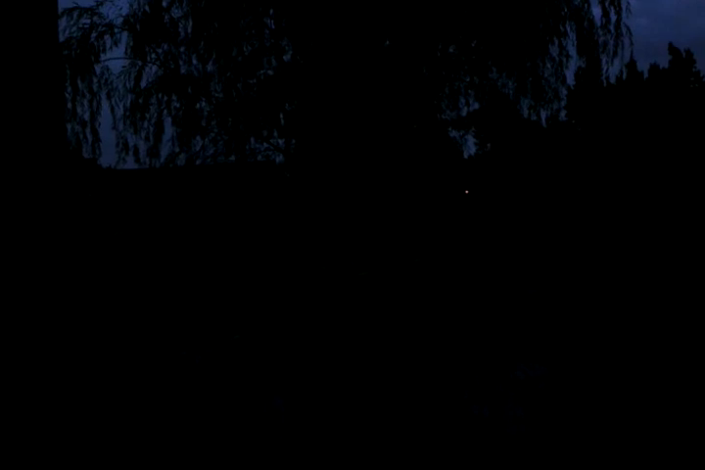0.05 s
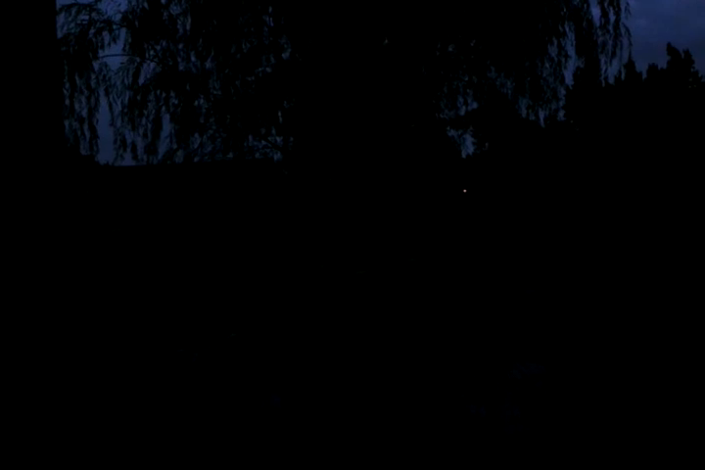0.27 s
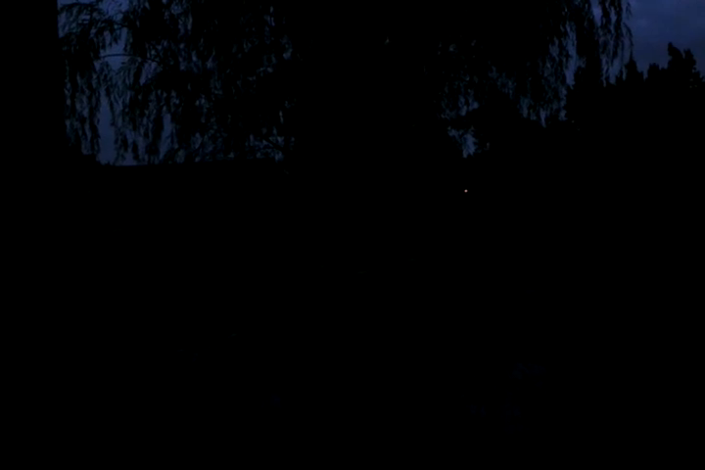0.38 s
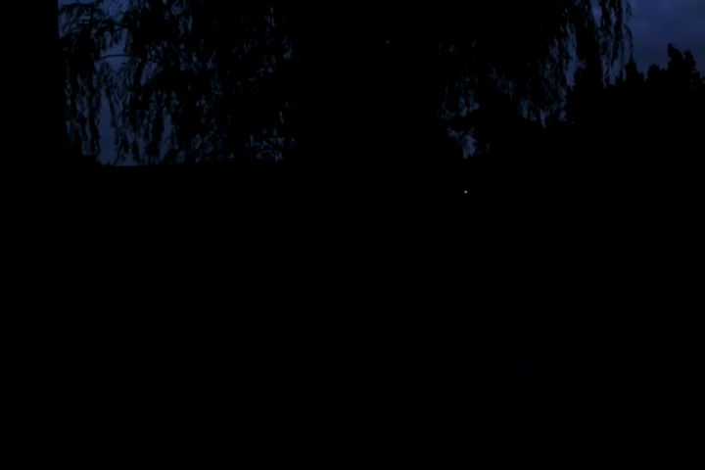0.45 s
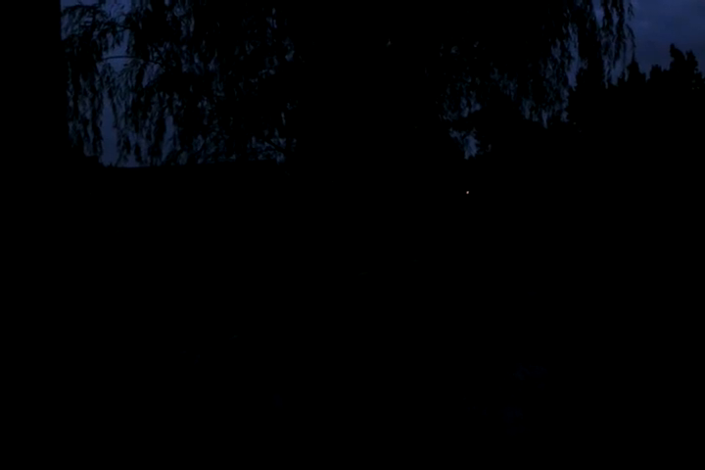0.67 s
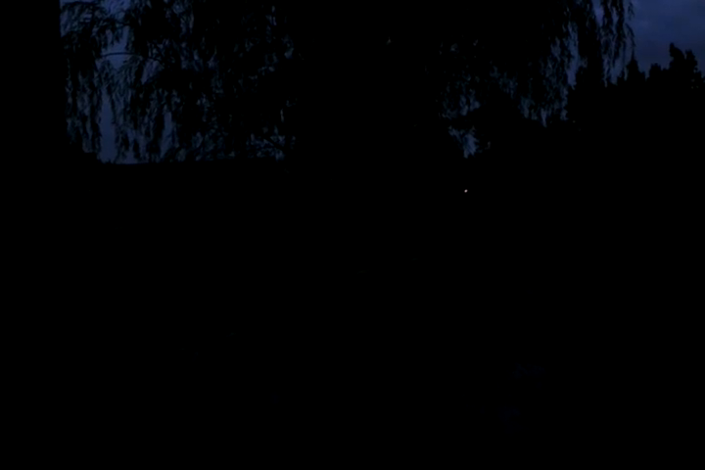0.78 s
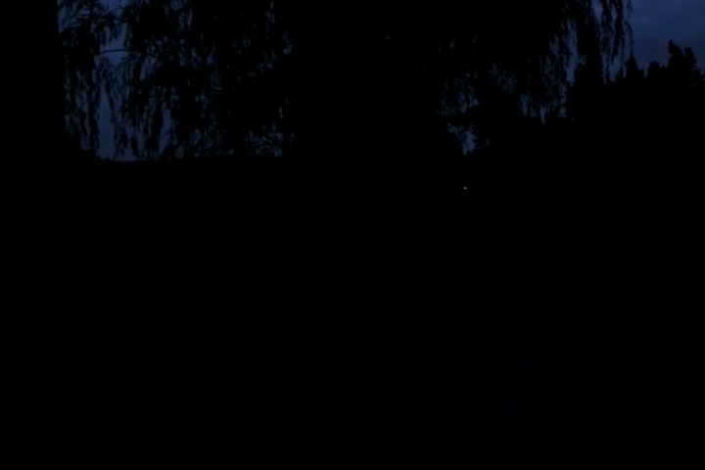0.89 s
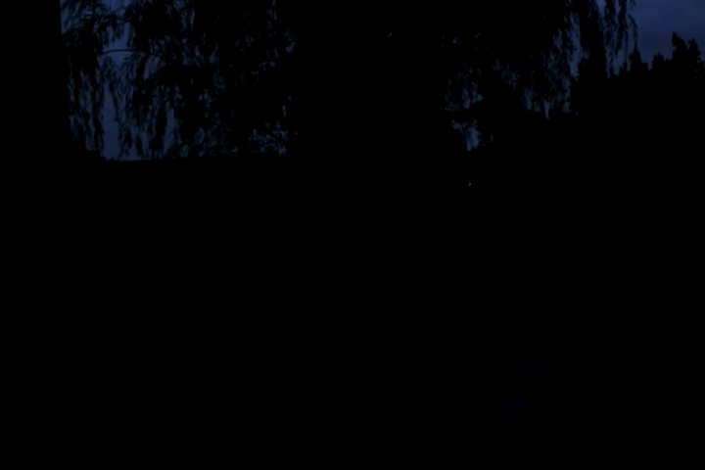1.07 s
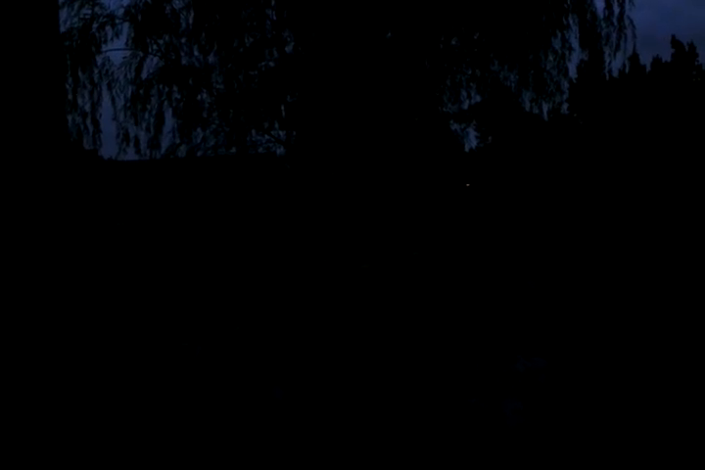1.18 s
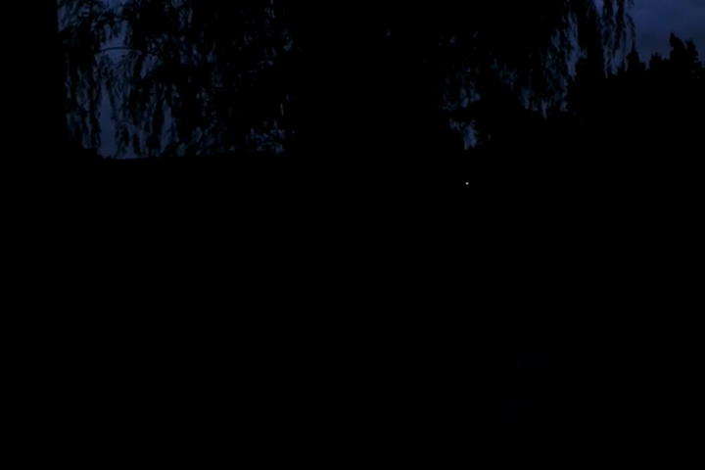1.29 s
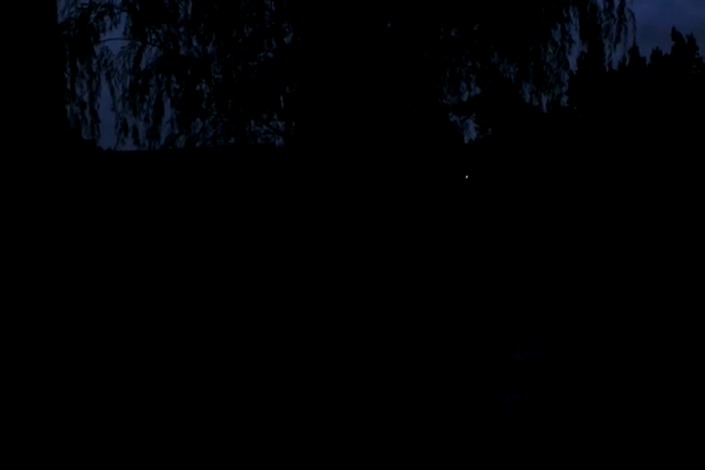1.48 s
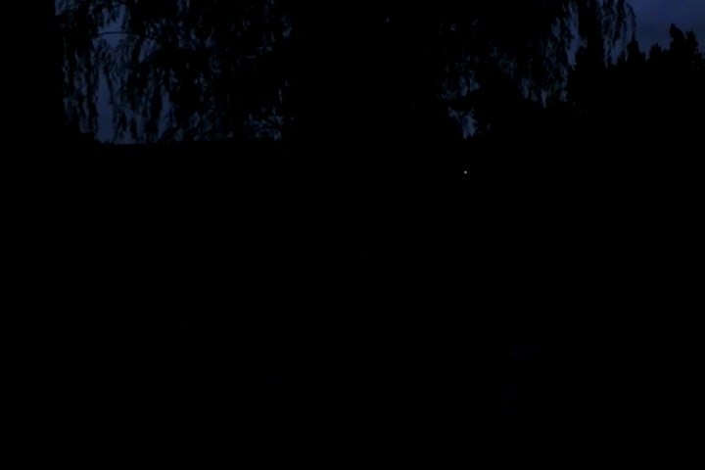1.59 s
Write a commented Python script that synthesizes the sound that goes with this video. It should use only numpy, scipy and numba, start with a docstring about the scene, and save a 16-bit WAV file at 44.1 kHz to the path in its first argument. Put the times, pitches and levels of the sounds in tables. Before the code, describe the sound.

Frogs call among trees at night: a far croak ends, a loud rasping croak follows nearby, and several throbbing answers come from farther away. A few faint chirps, a blurred frog chorus and steady hiss lie behind them.

```python
"""Tree frogs at night. Over steady hiss and a distant chorus, a far croak is ending; a close, harsh
croak follows, then five answers from farther off, with three faint chirps among them.
In each croak the vocal membranes hum near 900 Hz and snap shut every few cycles; the snaps, smeared
by foliage, excite vocal sac and throat, and the call brightens. Most croaks throb in beats; some
settle into a clean buzz with a snap on every third cycle. The trees echo after each."""
import sys
import numpy as np
from scipy import signal
from scipy.fft import rfft, irfft
from scipy.io import wavfile
from scipy.ndimage import uniform_filter1d
from numba import njit

SR = 44100
rng = np.random.default_rng(int(sys.argv[2]) if len(sys.argv) > 2 else 0)


def put_to_file(sound):
    """Save the sound as 16-bit audio at rate SR, in the file named by the first command-line argument."""
    columns = np.atleast_2d(sound).T  # one column per channel
    safe = np.clip(columns, -1, 1)
    whole_steps = np.round(safe * 32767)
    wavfile.write(sys.argv[1], SR, whole_steps.astype(np.int16))


N = 72765

# Spectrum of the night air. Each row: frequency in Hz, relative level in dB.
AIR_SPECTRUM = [(30, -46.5), (64, -32.5), (92, -23.5), (120, -4.5), (214, -3.5), (350, -6.5), (600, -9.5),
                (870, -9), (1320, -3), (1700, -5.5), (2650, -1), (3300, -10), (4000, -6.5), (6400, -11),
                (7400, -23.5)]
# The far croaks. Each row: start in seconds, length in seconds, base pitch in Hz, base levels of hum,
# sac, throat and rasp in dB, time of one beat in seconds, beat rate in Hz, beat depth from 0 to 1,
# share of the call before it turns clean (above 1, never).
FAR_CROAKS = [(-.095, 0.17, 879.3, -43.5, -70, -40, -46.5, -.09, 50, 0, 0.5),
              (0.488, 0.078, 847, -56.5, -50.5, -53.5, -58.5, .51, 55.1, 0.33, 1.1),
              (0.658, .17, 890.6, -37.5, -41.5, -37.5, -45, .663, 62.3, 0.75, .42),
              (1.018, 0.14, 946.6, -41.5, -43, -44, -48, 1.1, 42.1, .6, 1.2),
              (1.376, .17, 883.4, -43, -49.5, -38, -49, 1.39, 50.1, 0, .42),
              (1.571, 0.12, 955.4, -42, -45, -47.5, -49.5, 1.571, 44, 0.25, 1.2)]
# Course of every far croak. Each row: share of its length, ratio to the base pitch, throat resonance
# in Hz, offsets to the levels of hum, sac, throat and rasp in dB.
FAR_COURSE = [(0, 1.025, 2070, -12.5, -1.5, -24.5, -12), (0.052, 1.02, 2140, -3.5, 0, -12.5, -5),
              (.26, 1.01, 2494, 1, 1, -1, -2.5), (.46, 1.0, 2775, 2, -0.5, -1.5, 5.5),
              (0.732, .998, 2860, 0, -9, -4, -3), (0.852, .985, 2850, -5, -12.5, -4.5, -9),
              (.92, .965, 3054, -27, -11.5, -19.5, -9), (1, 0.84, 2980, -44, -49, -9.5, -27)]
# Spectrum of the far frogs' snaps. Each row: frequency in Hz, relative level in dB.
FAR_RASP_SPECTRUM = [(500, -47.5), (820, -20), (1100, -6.5), (1450, -1.5), (1770, -9), (2050, -1),
                     (3500, -8.5), (3850, -7.5), (4400, -8), (4900, -13), (6200, -9.5), (7400, -20)]
# Course of the close croak. Each row: time in seconds, pitch in Hz, levels of hum, lower resonance,
# upper resonance and rasp in dB.
CLOSE_COURSE = [(.171, 821, -43, -45.5, -64.5, -56), (0.1836, 819, -49, -68.5, -57, -57),
                (0.189, 840, -34.5, -31, -67, -34.5), (0.202, 831.5, -38, -36.5, -50, -43.5),
                (.21, 855.6, -31.5, -17.5, -68.5, -31), (0.236, 852.4, -29, -16, -44.5, -33.5),
                (0.26, 848, -26.5, -22.5, -26.5, -38), (0.321, 849, -31, -23.5, -29, -39),
                (0.345, 805, -43.5, -28.5, -36, -39), (0.377, 781, -61.5, -54.5, -56.5, -49.5)]
# The close frog's lower and upper throat resonances. Each row: centre in Hz, width in Hz.
CLOSE_RESONANCES = [(2290, 325), (2830, 196)]
# Spectra of the close frog's snaps and of its treble. Each row: frequency in Hz, relative level in dB.
CLOSE_RASP_SPECTRUM = [(450, -75.5), (700, -15), (850, -3), (1050, -2.5), (1300, 3.5), (1800, 2),
                       (2700, -7.5), (4300, -21), (5100, -23.5), (6100, -20), (7200, -31.5)]
CLOSE_TREBLE_SPECTRUM = [(2200, -34), (3200, 4), (3700, 6), (4350, 1), (4900, -17), (5450, -8),
                         (5950, -3.5), (6350, -14), (6900, -37), (7500, -26.5)]
# Distant chirps. Each row: time of the peak in seconds, level in dB.
DISTANT_CHIRPS = [(0.871, -52), (0.923, -50), (1.27, -56)]

SAC_RATIO, SAC_WIDTH_HZ = 1.133, 101  # the vocal sac rings just above the hum
BEAT_FADE = .3  # share of the beat depth lost over a call


def undb(db):
    """Amplitude grows tenfold for every 20 dB."""
    return 10 ** (np.asarray(db) / 20)


def unit(x):
    """Normalisation to rms 1."""
    return x / np.sqrt(np.mean(x ** 2) + 1e-18)


def even(x, window_s=.0045):
    """Division by the running rms holds a vibration at a nearly steady strength."""
    power = uniform_filter1d(x ** 2, int(window_s * SR))
    return x / np.sqrt(np.abs(power) + .05 * np.mean(x ** 2))


def ring(x, hz, width_hz):
    """Resonance: two like resonators in cascade give a band with steep sides."""
    b, a = signal.iirpeak(hz, hz / width_hz, fs=SR)
    return signal.lfilter(b, a, signal.lfilter(b, a, x))


@njit
def glide(x, hz, width_hz):
    """Time-varying resonance: a band-pass with a moving centre."""
    y, band, low = np.empty(len(x)), 0., 0.
    for i in range(len(x)):
        g, damping = np.tan(np.pi * hz[i] / SR), width_hz / hz[i]
        v = (band + g * (x[i] + 1e-18 - low)) / (1 + g * (g + damping))
        band, low = 2 * v - band, low + 2 * g * v
        y[i] = damping * v
    return y


def colour(x, spectrum):
    """Minimum-phase filtering imposes a spectrum causally."""
    hz, db = np.array(spectrum, float).T
    freqs = np.maximum(np.fft.rfftfreq(2 * N, 1 / SR), 1)
    gain = undb(np.interp(np.log(freqs), np.log(hz), db))
    cepstrum = irfft(np.log(gain))
    cepstrum[1:N] *= 2
    cepstrum[N + 1:] = 0
    return irfft(rfft(x, 2 * N) * np.exp(rfft(cepstrum)))[:N]


def follow(t, course):
    """Linear interpolation of a course: on-off gate, progress from 0 to 1, then each column."""
    times = course[:, 0]
    gate = uniform_filter1d(1. * ((t > times[0]) & (t < times[-1])), size=96)
    progress = np.clip((t - times[0]) / (times[-1] - times[0]), 0, 1)
    return [gate, progress] + [np.interp(t, times, column) for column in course[:, 1:].T]


def waver(t, rate_hz, spread_db):
    """Random amplitude modulation: a gain that drifts between Gaussian levels in dB."""
    return undb(spread_db * np.interp(t * rate_hz, np.arange(N), rng.standard_normal(N)))


def night_air():
    """Filtered noise: a broad band is heard as hiss, a narrow low one as a faint drone."""
    hiss = unit(colour(rng.standard_normal(N), AIR_SPECTRUM))
    drone = unit(ring(rng.standard_normal(N), hz=117.6, width_hz=11))
    return undb(-53.5) * hiss + undb(-74.5) * drone


def chorus(t):
    """Incoherent sum: many distant frogs blur into a flickering band of noise."""
    blur = ring(rng.standard_normal(N), hz=2620, width_hz=460)
    return undb(-61.5) * unit(blur * waver(t, rate_hz=90, spread_db=4))


def hum(t, cycles):
    """The membranes' fundamental vibration: a slightly unsteady sine of rms 1."""
    return unit(np.sin(2 * np.pi * cycles) * waver(t, rate_hz=128.8, spread_db=1.5))


def snaps(cycles, clean_s, rough_jitter=.03, clean_jitter=.0081, scatter_db=5.5):
    """Impulse excitation: membranes shut every three or four cycles, then every third once clean."""
    count = 600
    skip = rng.random(count) < .5
    late, spread = rng.standard_normal(count), rng.standard_normal(count)
    clean_cycle = np.interp(clean_s * SR, np.arange(N), cycles)
    clean = np.cumsum(3 + skip) > clean_cycle
    snap_cycle = np.cumsum(3 + (skip & ~clean)) + late * np.where(clean, clean_jitter, rough_jitter)
    place = np.interp(snap_cycle, cycles, np.arange(N))
    size = np.where(clean, 1, undb(scatter_db * spread)) * (place < N - 1)
    index, part = place.astype(int), place % 1  # each snap is shared between two samples
    return (np.bincount(index, size * (1 - part), N + 1) + np.bincount(index + 1, size * part, N + 1))[:N]


def foliage(x, max_delay_s=.009, step_hz=109.57):
    """Scattering by leaves: each frequency arrives with its own small group delay."""
    freqs = np.fft.rfftfreq(2 * N, 1 / SR)
    delay = max_delay_s * np.interp(freqs / step_hz, np.arange(N), rng.random(N))
    phase = -2 * np.pi * np.cumsum(delay) * freqs[1]
    return irfft(rfft(x, 2 * N) * np.exp(1j * phase))[:N]


def beats(t, beat_s, hz, depth):
    """Amplitude modulation by the throbbing air flow: 1 on a beat, 1 - depth between beats."""
    return 1 - depth * np.sin(np.pi * hz * (t - beat_s)) ** 2


def far_frogs(t, throat_width_hz=800., full_depth_bend_hz=70):
    """Source and filter move independently: the pitch sags while the throat resonance glides upward."""
    out = 0
    for start, length, pitch, *levels, beat_s, beat_hz, depth, rough_share in FAR_CROAKS:
        course = np.array(FAR_COURSE, float) * [length, pitch, 1, 1, 1, 1, 1] + [start, 0, 0, *levels]
        gate, progress, hz, throat_hz, hum_db, sac_db, throat_db, rasp_db = follow(t, course)
        depth_now = depth * (1 - BEAT_FADE * progress ** 2)
        throb = beats(t, beat_s, beat_hz, depth_now)
        cycles = np.cumsum(hz) / SR
        bend = np.cumsum(full_depth_bend_hz * (throb - 1 + depth_now / 2)) / SR  # pitch lifts on a beat
        pulses = foliage(snaps(cycles, clean_s=start + rough_share * length))
        throat = even(glide(glide(pulses, throat_hz, throat_width_hz), throat_hz, throat_width_hz))
        sac = even(ring(pulses, SAC_RATIO * pitch, SAC_WIDTH_HZ))
        rasp = even(colour(pulses, FAR_RASP_SPECTRUM))
        low = undb(hum_db) * hum(t, cycles + bend) + undb(sac_db) * sac
        buzz = undb(throat_db) * throat + undb(rasp_db) * rasp
        out = out + gate * (throb * low + np.sqrt(throb) * buzz)
    return out


def tree_echo(x, t, t60_s=.41, delay_s=.027):
    """Reverberation: diffuse reflections from the surrounding trees decay exponentially."""
    tail = rng.standard_normal(N) * np.exp(-np.log(1000) * t / t60_s) * (t > delay_s)
    return signal.fftconvolve(x, tail / np.linalg.norm(tail))[:N]


def close_frog(t, beat_s=.2095, beat_hz=47.6):
    """Irregular snaps drive two fixed resonances: the lower throbs first, the upper joins with treble."""
    gate, progress, hz, hum_db, lower_db, upper_db, rasp_db = follow(t, np.array(CLOSE_COURSE, float))
    fade = 1 - BEAT_FADE * progress ** 2
    soft_throb = beats(t, beat_s, beat_hz, depth=.15 * fade)
    hard_throb = beats(t, beat_s, beat_hz, depth=.72 * fade)
    cycles = np.cumsum(hz) / SR
    pulses = foliage(snaps(cycles, clean_s=t[-1]))  # rough throughout
    lower, upper = (even(ring(pulses, *resonance)) for resonance in CLOSE_RESONANCES)
    sac = even(ring(pulses, SAC_RATIO * hz.max(), SAC_WIDTH_HZ))
    treble = even(colour(pulses, CLOSE_TREBLE_SPECTRUM))
    low = undb(hum_db) * (hum(t, cycles) + undb(-13) * sac)
    high = undb(upper_db) * (upper + undb(-9.5) * treble)
    rasp = undb(rasp_db) * even(colour(pulses, CLOSE_RASP_SPECTRUM))
    return gate * (hard_throb * undb(lower_db) * lower + soft_throb * (low + high + rasp))


def chirps(t, sigma_s=.0057):
    """Gaussian envelopes on a band of noise are heard as short, distant chirps."""
    band = even(ring(rng.standard_normal(N), hz=2400, width_hz=800))
    return band * sum(undb(db) * np.exp(-.5 * ((t - peak_s) / sigma_s) ** 2)
                      for peak_s, db in DISTANT_CHIRPS)


def scene():
    """Superposition of frogs, echo and night air; the far frogs carry the larger share of echo."""
    t = np.arange(N) / SR
    close, far = close_frog(t), far_frogs(t)
    echo = tree_echo(undb(-25) * close + undb(-17.5) * far, t)
    return (night_air() + chorus(t) + far + echo + close + chirps(t))[None]


def record(dry):
    """Elliptic low-pass filtering cuts the treble steeply."""
    top_hz = 7150
    return signal.sosfilt(signal.ellip(8, .3, 70, top_hz, fs=SR, output="sos"), dry)


dry = scene()
out = record(dry)
put_to_file(out)
```